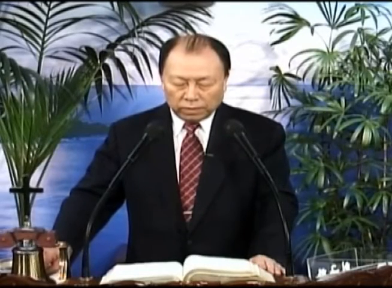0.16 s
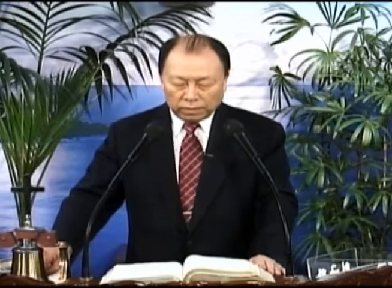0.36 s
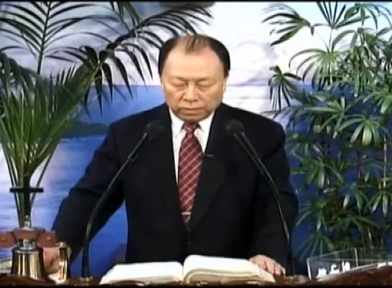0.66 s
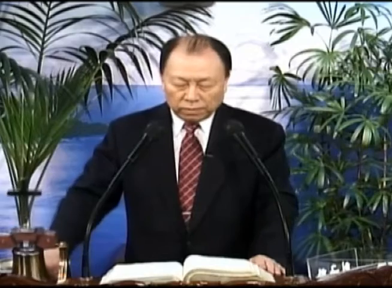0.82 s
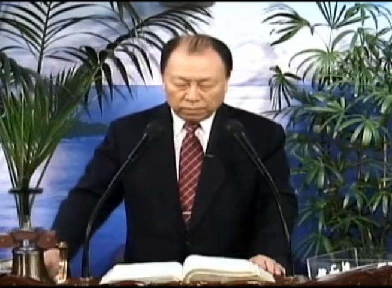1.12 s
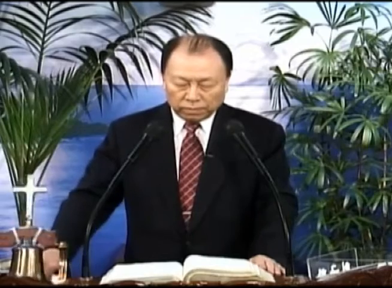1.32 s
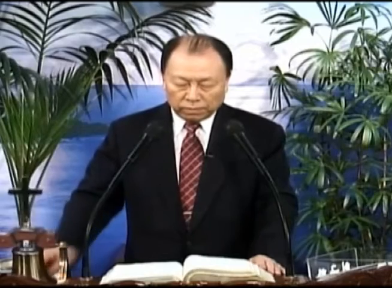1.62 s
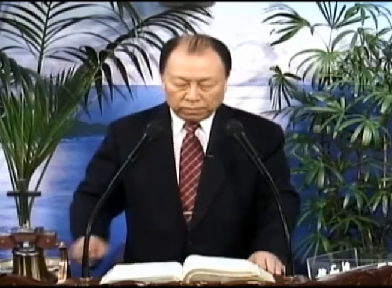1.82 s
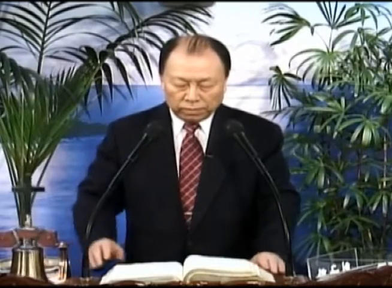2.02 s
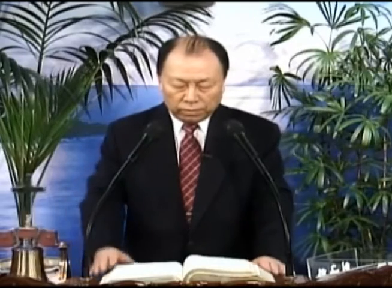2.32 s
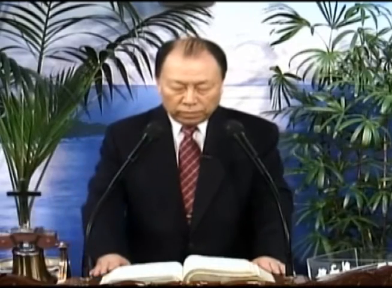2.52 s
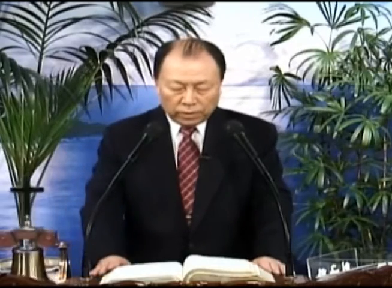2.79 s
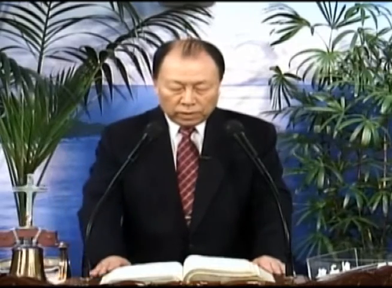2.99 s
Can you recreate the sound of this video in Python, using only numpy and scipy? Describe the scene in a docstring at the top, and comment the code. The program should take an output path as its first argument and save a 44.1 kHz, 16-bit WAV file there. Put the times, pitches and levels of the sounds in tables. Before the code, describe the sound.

One bright metallic bell strike with a hard clack, then a shimmering high tone slowly fading.

```python
"""Hand bell in a quiet hall

A small brass hand bell on a lectern is struck once and rings out, its decaying sine partials beating against
close neighbours. Bursting noise, short rings and a low knock make the blow; a decaying noise tail makes the
hall. Faint, wavering deep sines sound below, with shaped noise for hiss and soft bumps. A limiter and soft
clipping hold down the clang, and a jumping voltage offset adds faint deep thumps."""
import sys
import numpy as np
from scipy import signal
from scipy.fft import rfft, irfft
from scipy.io import wavfile
from scipy.ndimage import uniform_filter1d

SR = 44100
rng = np.random.default_rng(int(sys.argv[2]) if len(sys.argv) > 2 else 0)


def to_wav(sig):
    """Store sig (one row per channel, or 1-D mono) as 16-bit WAV at the path in sys.argv[1].

    Samples outside -1..1 are clipped; the rate is SR.
    """
    pcm = np.clip(np.atleast_2d(sig), -1, 1) * 32767
    pcm = np.round(pcm).astype(np.int16)
    wavfile.write(sys.argv[1], SR, pcm.T)  # frames by channels


N = 138915  # length in samples

# Levels are those ahead of the limiter and soft clipping.
# Partials of the bell: f/Hz, level/dB, t60/s
BELL_PARTIALS = [ (1174.7, -56.5, 11.37), (2330.5, -74, 3.2), (2667, -58.5, 3.7), (2689.8, -58, 5.62),
                 (3282.3, -53, 5.72), (3674.9, -34.3, .6), (4507, -54, 2.31), (5002, -29.5, 0.56),
                 (5613, -30.5, .25), (6002, -50.5, 1.21), (6649.8, -41, .27), ]
# Close tones beside each partial, one list per partial in the same order:
# distance from the partial f/Hz, level relative to the partial/dB
BEATING_NEIGHBOURS = [
    [(-.36, 0), (.7, -4), (2.42, -8)],
    [(.88, -2), (-3.14, -6)],
    [(-.46, 0), (3.9, -6), (-1.89, -11)],
    [(.39, -5), (-3.09, -11), (-1.69, -11)],
    [(.22, -7), (-6.02, -3.5), (-7.91, -20)],
    [(-2.95, -7), (7.93, 0), (12.7, -6)],
    [(-2.42, 0), (1.11, -4), (-5.23, -1)],
    [(4.61, -7), (-2.59, -6)],
    [(-7.04, -7), (-12.18, -1)],
    [(-3.09, -10), (-5.58, -9), (-13.8, -11)],
    [(14.19, -7), (-5.99, -4)],
]
# Spectral shape of the striker's clack: f/Hz, relative density/dB per Hz
CLACK_SPECTRUM = [(60, 7), (200, -2), (400, -7), (800, -9.5), (1800, -2), (2350, -2), (2900, -1), (3700, 2),
                  (5400, -0.5), (7500, -7), (12000, -12.5), (15500, -17)]
# Short rings set off by the blow: f/Hz, level/dB, t60/s
SHORT_RINGS = [ (1026, -40, 0.1), (1320, -44.5, 0.14), (1800, -49, 0.071), (2344, -33.5, .11),
               (3682, -19.5, 0.069), (6200, -56, .2), (12470, -35.5, 0.067), (5664, -50, .38),
               (6917, -44, .14), (7736, -68, .45), (8899, -67, .5), (10001, -47, .14), (11110, -52, .24),
               (13675, -47, .13), (14280, -50, .13), (15010, -52, .14), ]
# Dull knock of the lectern under the bell: f/Hz, level/dB, t60/s
LECTERN_KNOCK = [(72, -36, .13), (127, -49, 0.12), (210, -44, 0.11), (275, -47.5, 0.11), (579, -53.5, 0.19)]
# Decay of the hall: f/Hz, t60/s
HALL_DECAY = [(150, 0.23), (700, 0.57), (3000, 0.73), (8000, 0.81), (15000, 0.23)]
# Faint low lines, deep tones: f/Hz, rms level before the waver/dB
LOW_LINES = [(86.1, -68.5), (129.2, -80.5), (172.3, -93.5), (215.3, -97.5)]
# Spectral shape of the room noise and hiss: f/Hz, relative density/dB per Hz
HISS_SPECTRUM = [(40, 12), (100, 8), (200, -4.5), (350, -7), (550, -2), (1000, -2.5), (1500, -5),
                 (2200, -5), (4000, -8.5), (7000, -16), (15500, -20)]
# Slow level curve of the hiss: t/s, level relative to HISS_DB/dB
HISS_CURVE = [(0, -2), (.72, -1), (.9, 1.5), (1.3, 3), (2.2, 2), (3.15, 2)]
# Faint, dull bumps: t/s, peak level/dB
BUMP_EVENTS = [(.23, -80.5), (.31, -77), (0.659, -78.5), (0.756, -59.5), (1.48, -80), (1.52, -80),
               (1.73, -76), (2.045, -77), (2.115, -75), (2.42, -74.5), (2.56, -78), (2.641, -74.5),
               (2.96, -74.5)]
# Spectral shape of the bumps: f/Hz, relative density/dB per Hz
BUMP_SPECTRUM = [(50, -6.5), (150, -1.5), (260, 0), (340, -14), (480, -16.5), (1000, -28), (4000, -50),
                 (15000, -35)]
# Jumps of the voltage offset: t/s (middle of the slide), jump/share of full scale
OFFSET_JUMPS = [(.455, 0.0066), (0.756, -0.0037), (1.011, -0.0067), (1.268, 0.011), (1.432, -.008),
                (1.824, 0.01), (2.52, -0.011), (2.824, 0.0084), (3.032, -0.012)]

STRIKE_S = .7808
BLOOM_S = 0.022  # time constant of the bell's swell
CLACK_DB, CLACK_T60_S, CLACK_STOP_S, CLACK_ATTACK_S = -30.5, 0.16, 0.069, 0.0028
HALL_DB = -25  # gain of the hall tail
LINE_WAVER, WAVER_S = .15, 0.13  # depth as a share of the level, time between random values
HISS_DB, HISS_PATCHY_DB = -78, 4.5  # base level, spread of the patches
BUMP_S = 0.015  # from a bump's peak to 1/e of it
OFFSET, JUMP_S = 0.098, 0.015  # starting offset as a share of full scale, length of a slide
LIMIT_DB, LIMIT_RELEASE_DB_PER_S, CLIP_DB = -32.5, 164, -29
EDGE_HZ = 15800  # edge of the closing low-pass


def amp(db):
    """Turns decibels into gain."""
    return 10 ** (np.asarray(db) / 20)


def unit(x):
    """Scales a signal to rms 1."""
    return x / np.sqrt(np.mean(x ** 2) + 1e-20)


def read(points, hz):
    """Reads a curve along a log-frequency axis."""
    f, value = np.transpose(points)
    return np.interp(np.log(hz + 1), np.log(f + 1), value)


def coloured(spectrum):
    """Steady noise of rms 1 with the given spectral shape."""
    bins = rfft(rng.standard_normal(N))
    gain = amp(read(spectrum, np.fft.rfftfreq(N, 1 / SR)))
    return unit(irfft(bins * gain, N))


def since_strike():
    """Seconds since the blow, zero before it."""
    return np.maximum(np.arange(N) / SR - STRIKE_S, 0)


def ring(hz, db, t60):
    """One mode: a sine that starts at the blow and dies away exponentially."""
    t = since_strike()
    return amp(db - 60 * t / t60) * np.sin(2 * np.pi * hz * t)


def bell():
    """The partials swell up after the blow and beat against their neighbours as they fade."""
    tone = np.zeros(N)
    for (hz, db, t60), neighbours in zip(BELL_PARTIALS, BEATING_NEIGHBOURS):
        tone += ring(hz, db, t60)
        for apart_hz, relative_db in neighbours:
            tone += ring(hz + apart_hz, db + relative_db, t60)
    swell = 1 - np.exp(-since_strike() / BLOOM_S)
    return tone * swell


def clack():
    """The blow: dense metallic noise that soon stops, short rings and a knock in the lectern."""
    t = since_strike()
    decay = amp(CLACK_DB - 60 * t / CLACK_T60_S)
    stop = 1 / (1 + (t / CLACK_STOP_S) ** 10)
    burst = coloured(CLACK_SPECTRUM) * decay * stop
    rings = sum(ring(*mode) for mode in SHORT_RINGS + LECTERN_KNOCK)
    attack = 1 - np.exp(-t / CLACK_ATTACK_S)
    return (burst + rings) * attack


def hall(x):
    """A diffuse noise tail convolved with the sound, each band dying at its own speed."""
    hz, t, bands = signal.stft(rng.standard_normal(SR), SR, nperseg=256)
    decay = amp(-60 * t / read(HALL_DECAY, hz)[:, None])
    tail = signal.istft(bands * decay, SR)[1]
    tail = tail / np.linalg.norm(tail)
    return amp(HALL_DB) * signal.fftconvolve(x, tail)[:N]


def low_lines():
    """Faint low sine lines whose level wavers a little, all together."""
    t = np.arange(N) / SR
    knots = np.arange(64) * WAVER_S
    waver = 1 + LINE_WAVER * np.interp(t, knots, rng.standard_normal(len(knots)))
    lines = np.zeros(N)
    for hz, db in LOW_LINES:
        phase = rng.random()  # in turns
        lines += np.sqrt(2) * amp(db) * np.sin(2 * np.pi * (hz * t + phase))
    return waver * lines


def hiss():
    """Faint background noise, slightly patchy in time and pitch, on a slow level curve."""
    hz, _, bands = signal.stft(rng.standard_normal(N), SR, nperseg=1024)
    patches = uniform_filter1d(rng.standard_normal(bands.shape), size=5, axis=0)
    patches = unit(uniform_filter1d(patches, size=5, axis=1))
    gain = amp(read(HISS_SPECTRUM, hz)[:, None] + HISS_PATCHY_DB * patches)
    noise = signal.istft(bands * gain, SR)[1][:N]
    curve_db = np.interp(np.arange(N) / SR, *np.transpose(HISS_CURVE))
    return unit(noise) * amp(HISS_DB + curve_db)


def bumps():
    """Soft low puffs of noise in bell-curve envelopes; the strongest comes right before the blow."""
    t = np.arange(N) / SR
    envelope = sum(amp(db) * np.exp(-((t - s) / BUMP_S) ** 2) for s, db in BUMP_EVENTS)
    return coloured(BUMP_SPECTRUM) * envelope


def offset():
    """The voltage offset slides quickly to each new value with a faint, deep thump."""
    t = np.arange(N) / SR
    level = np.full(N, OFFSET)
    for s, jump in OFFSET_JUMPS:
        progress = np.clip((t - s) / JUMP_S, -.5, .5)
        level += jump * (1 + np.sin(np.pi * progress)) / 2
    return level


def scene():
    """The struck bell in the hall, over faint deep tones, hiss and faint bumps."""
    struck = bell() + clack()
    return (struck + hall(struck) + low_lines() + hiss() + bumps())[None]


def record(dry):
    """A fast limiter and soft clipping hold down the clang; then the offset and the band limit."""
    power_db = 10 * np.log10(abs(uniform_filter1d(dry[0] ** 2, size=180)) + 1e-12)
    # the detector follows rises at once and falls no faster than the release
    fall = np.arange(N) / SR * LIMIT_RELEASE_DB_PER_S
    detected_db = np.maximum.accumulate(power_db + fall) - fall
    over_db = np.maximum(detected_db - LIMIT_DB, 0)
    held = dry[0] / amp(uniform_filter1d(over_db, size=60))
    clipped = amp(CLIP_DB) * np.tanh(held / amp(CLIP_DB))
    out = clipped + offset()
    low_pass = signal.firwin(511, EDGE_HZ, window=("kaiser", 9), fs=SR)
    padded = np.pad(out, len(low_pass) // 2, "edge")  # keeps the offset steady at both ends
    return signal.oaconvolve(padded, low_pass, "valid")[None]


dry = scene()
out = record(dry)
to_wav(out)
```